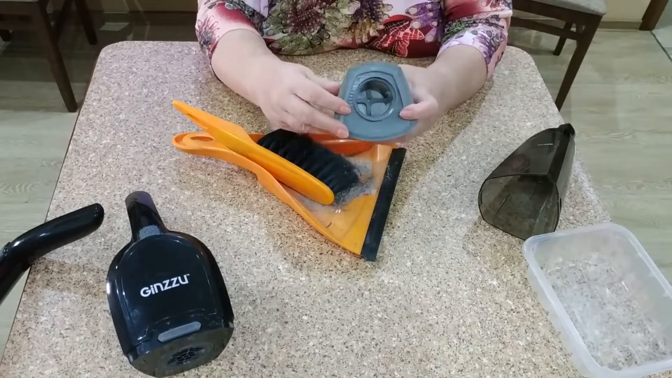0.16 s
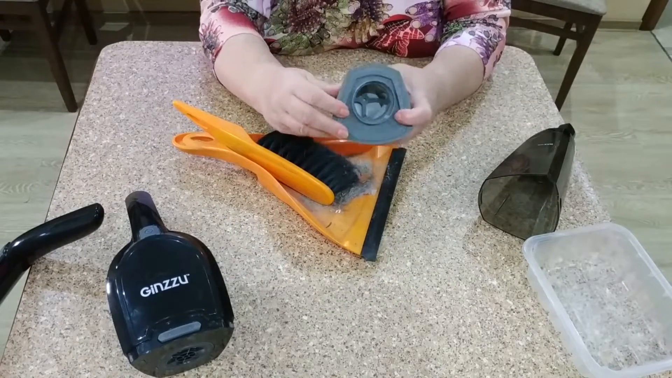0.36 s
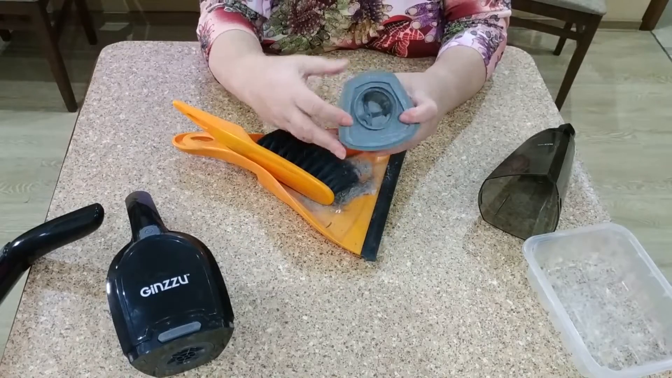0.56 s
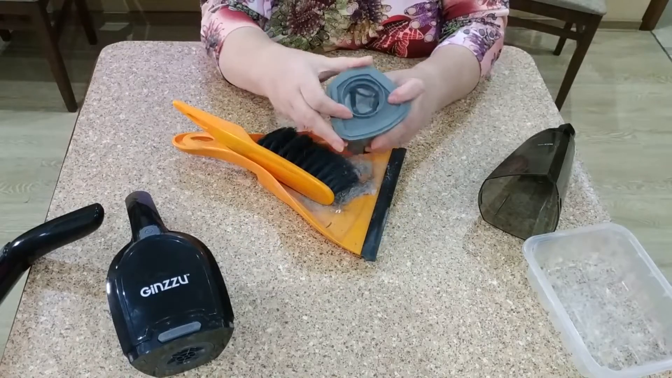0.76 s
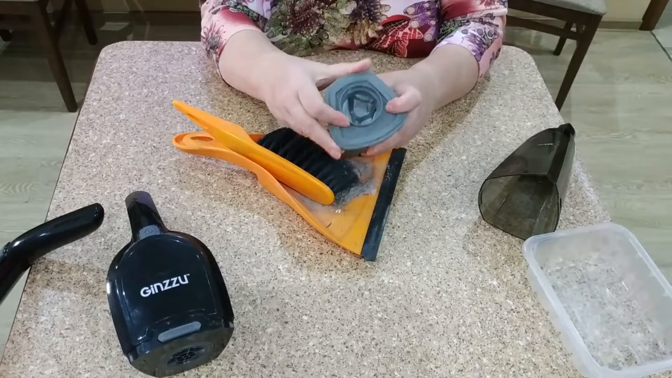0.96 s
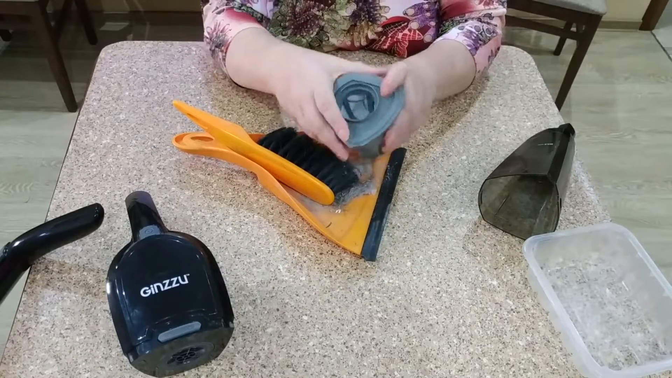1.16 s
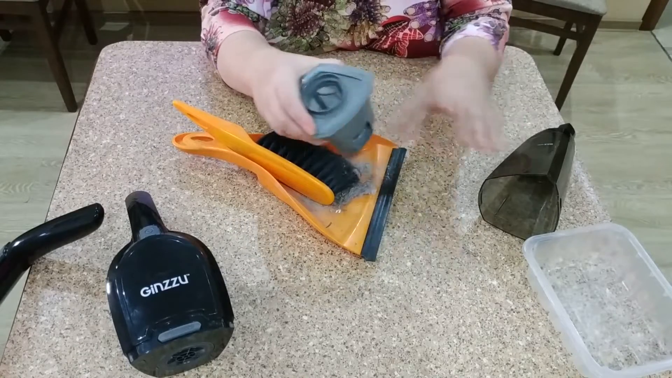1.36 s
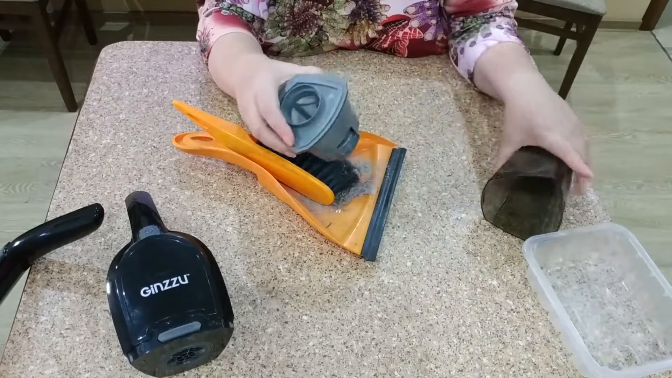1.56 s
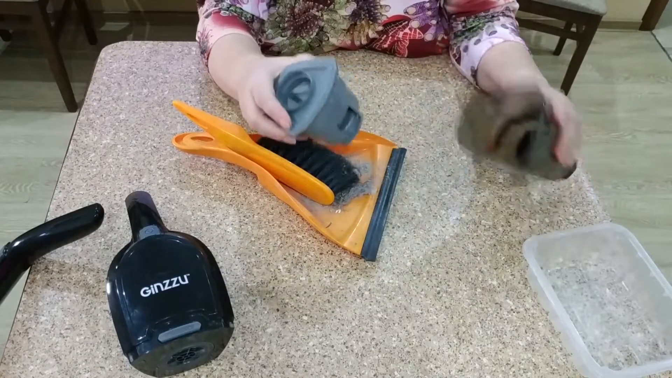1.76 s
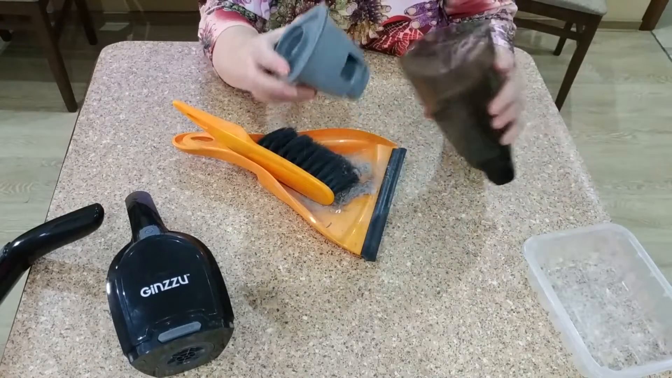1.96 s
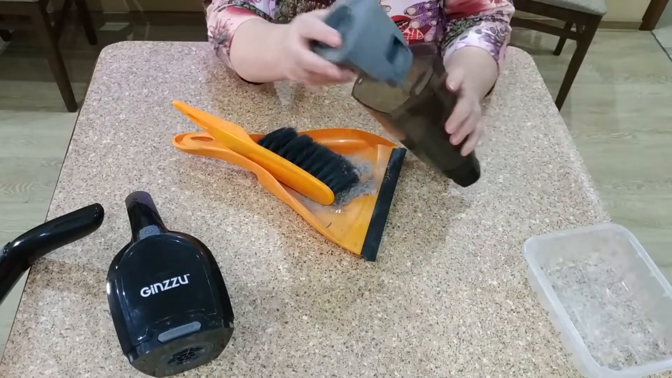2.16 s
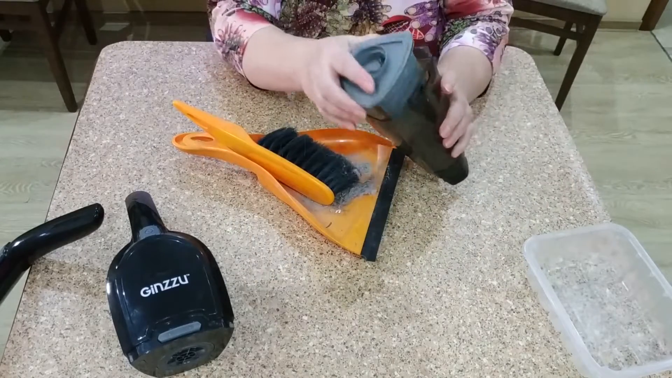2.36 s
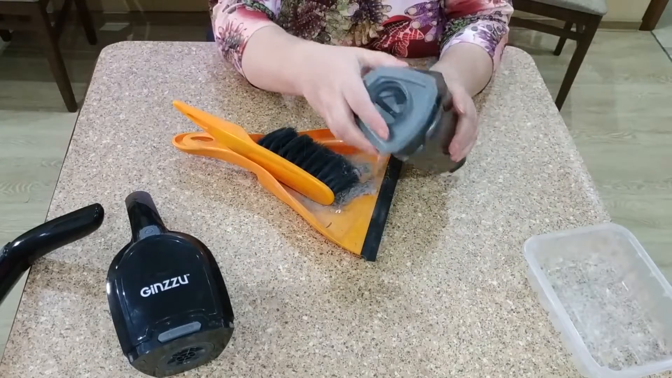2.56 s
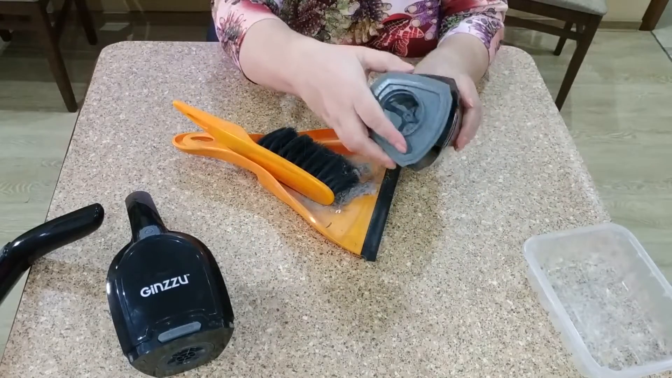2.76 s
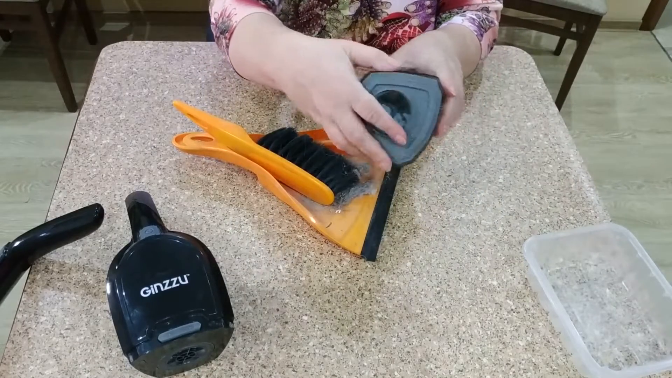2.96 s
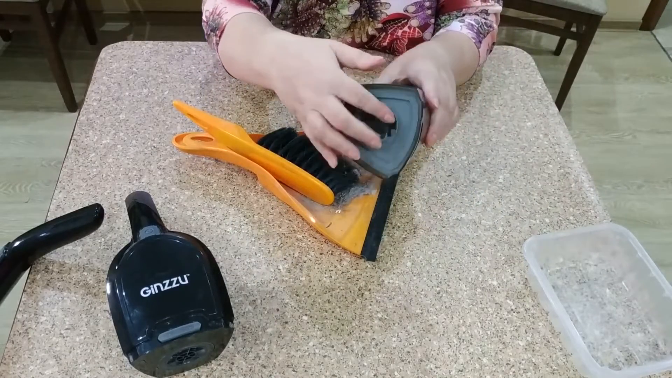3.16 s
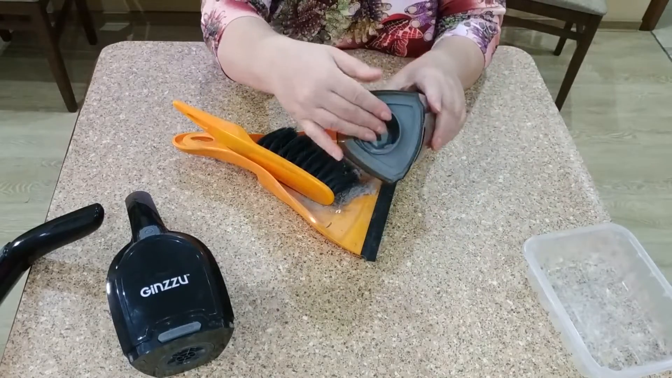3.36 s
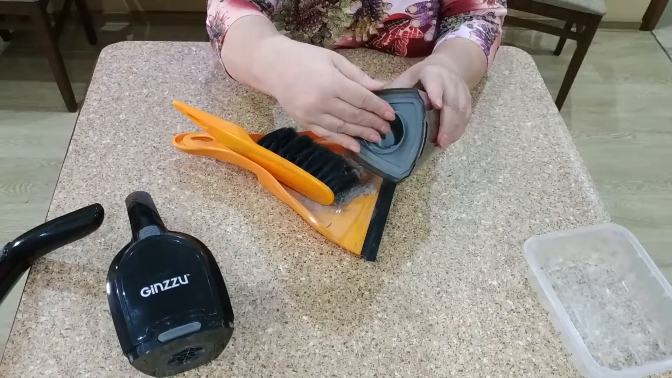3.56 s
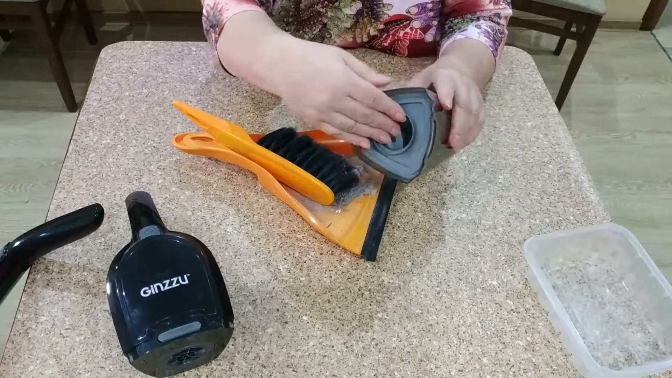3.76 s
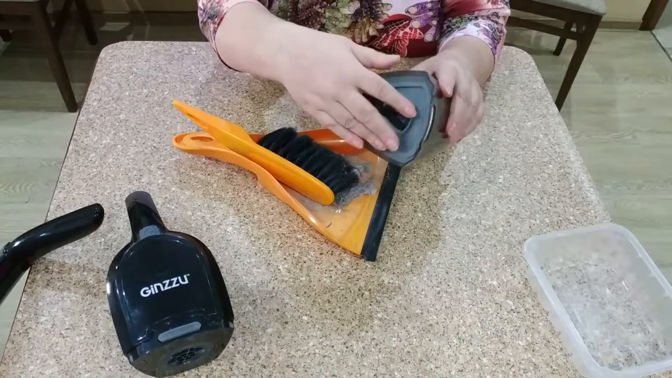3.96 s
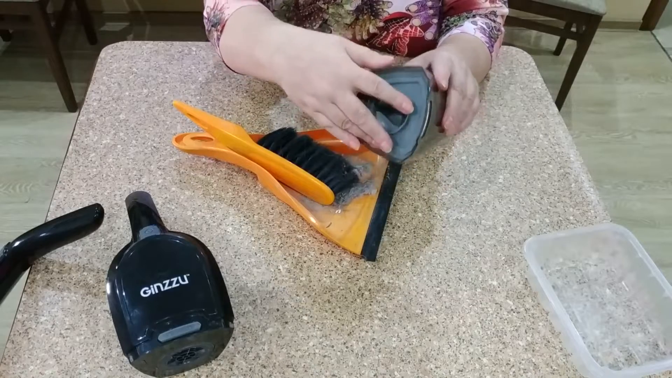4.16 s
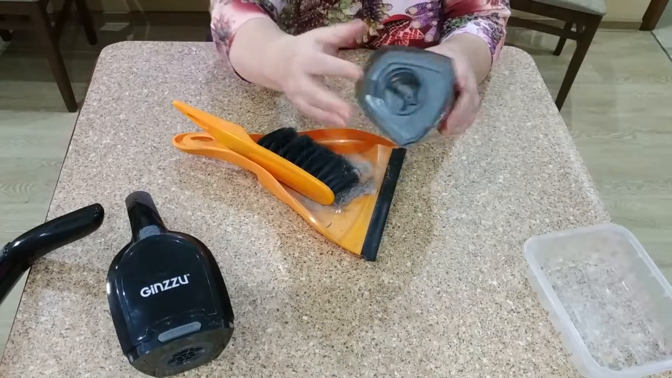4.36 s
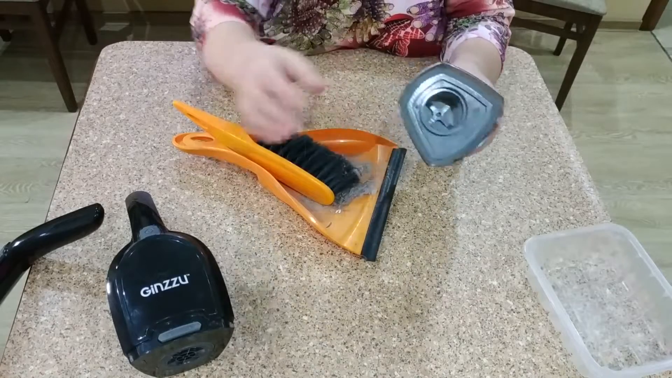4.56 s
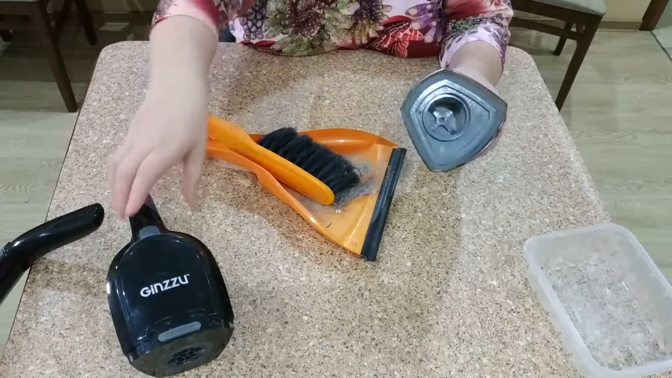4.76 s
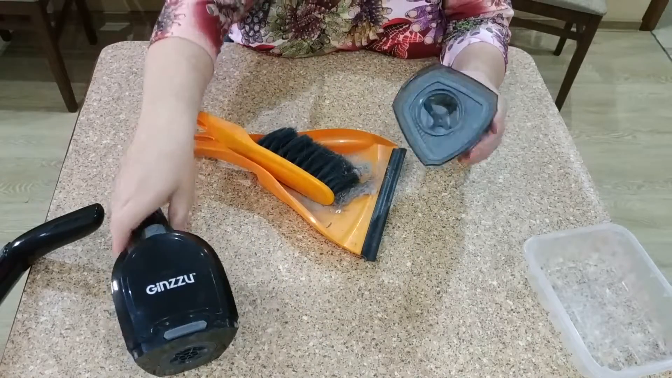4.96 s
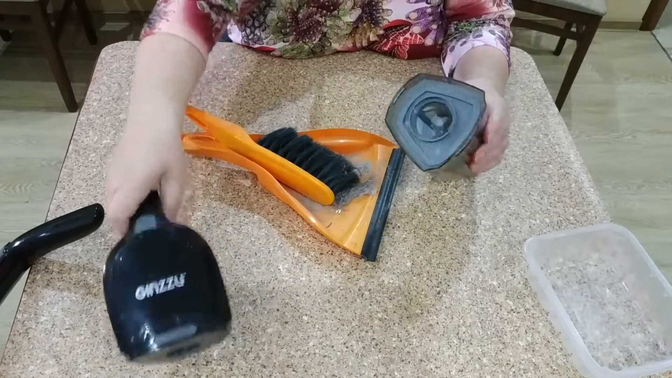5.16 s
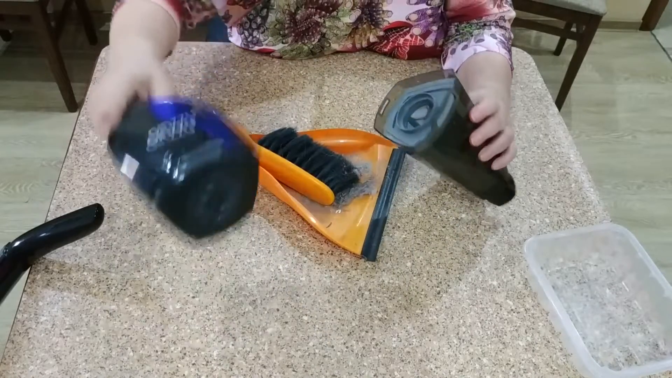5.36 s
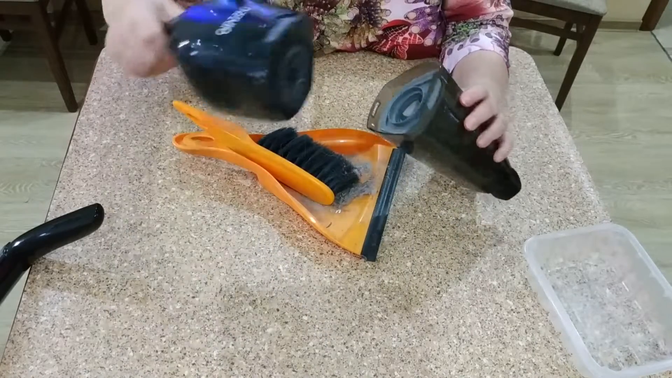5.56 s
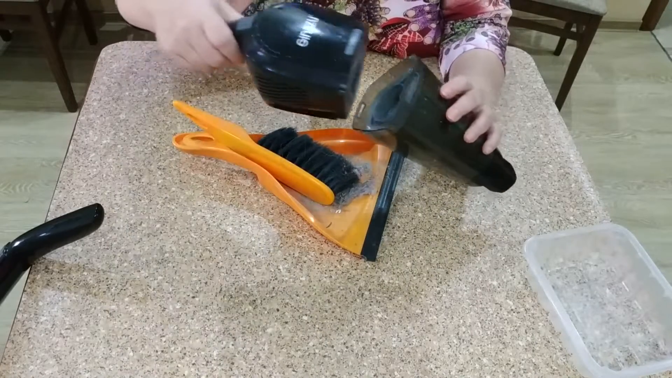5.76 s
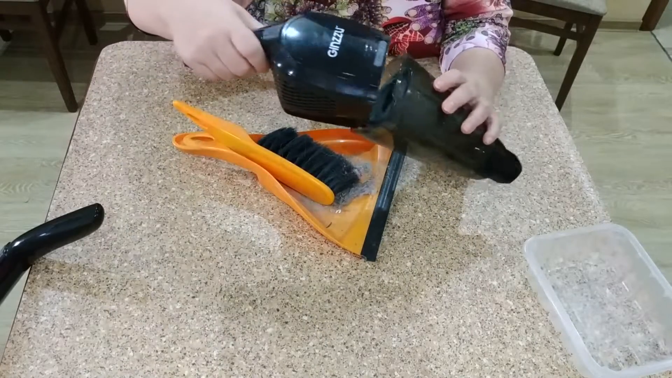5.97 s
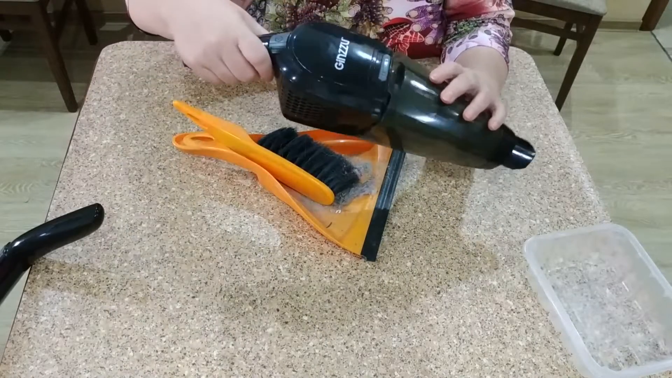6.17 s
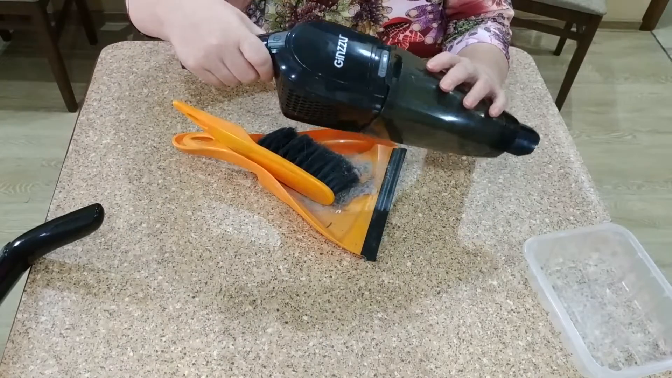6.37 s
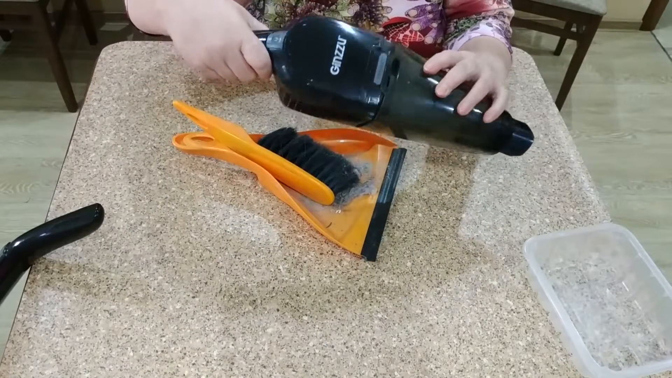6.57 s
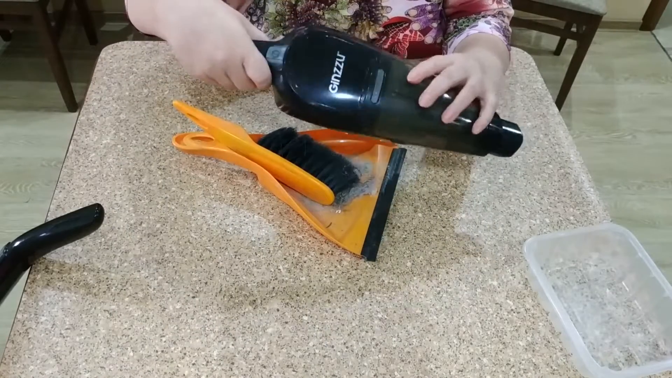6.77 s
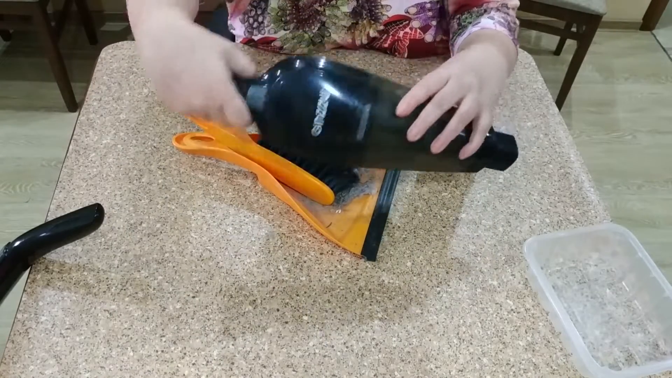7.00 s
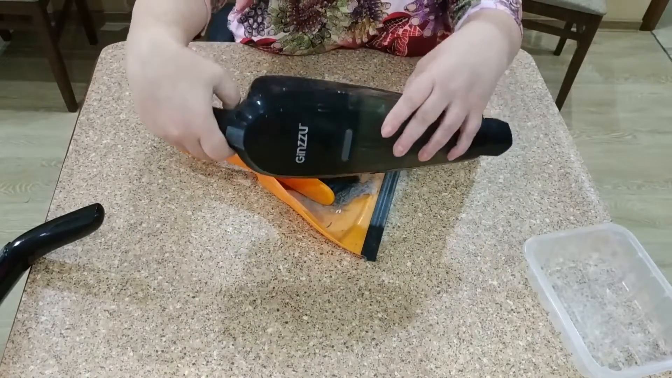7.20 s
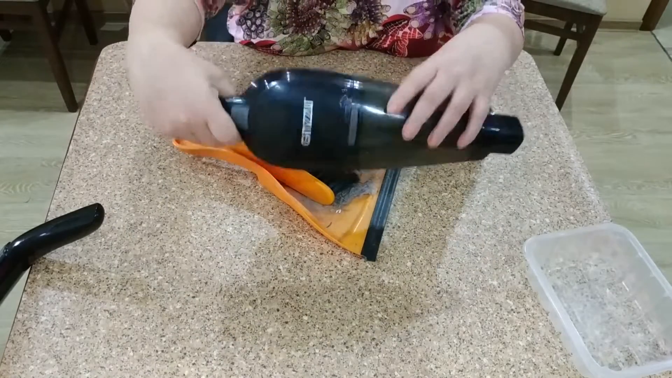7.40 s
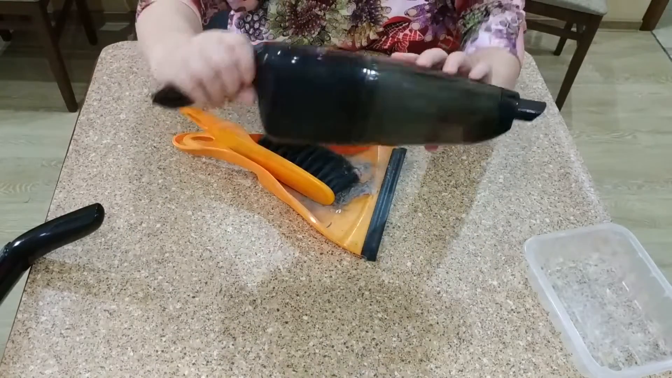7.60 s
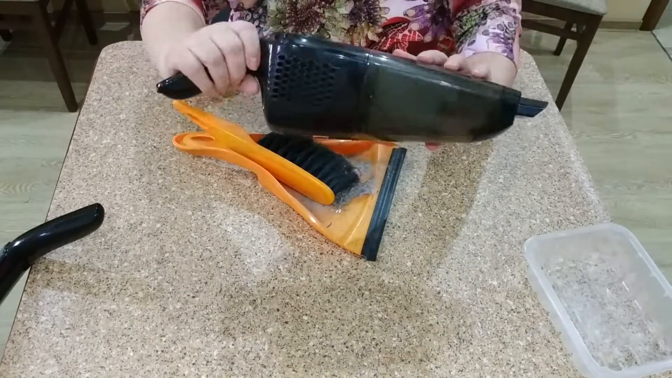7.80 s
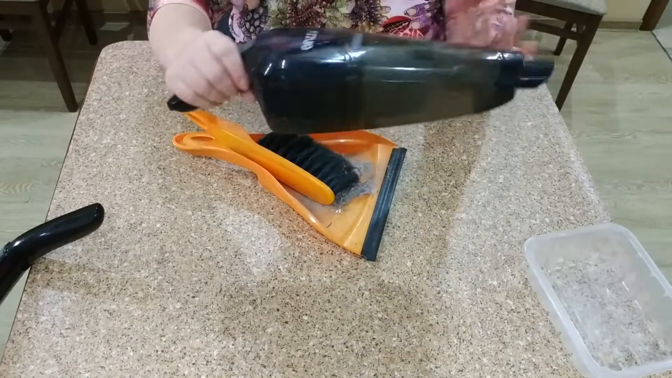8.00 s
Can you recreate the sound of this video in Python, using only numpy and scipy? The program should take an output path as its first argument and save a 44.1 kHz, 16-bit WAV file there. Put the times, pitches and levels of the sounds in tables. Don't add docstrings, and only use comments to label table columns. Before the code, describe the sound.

In a quiet, slightly live room, hands rub and tick against light plastic parts. A soft hollow knock is followed by a loud clack and short grind as a filter is pushed into a cup. After faint handling, the motor body knocks on in a cluster and latches with a very sharp snap. Close stereo microphone above the table.

```python
import sys
import numpy as np
from scipy import signal
from scipy.fft import rfft, irfft
from scipy.io import wavfile
from scipy.ndimage import map_coordinates

SR = 44100
rng = np.random.default_rng(int(sys.argv[2]) if len(sys.argv) > 2 else 0)


def amplitude_ratio(level_db):
    exponent = np.asarray(level_db, float) / 20
    return 10 ** exponent


def wav_record(signal):
    frames = np.transpose(np.atleast_2d(signal))
    bounded = np.clip(frames, -1, 1)
    quanta = np.round(bounded * 32767).astype(np.int16)
    wavfile.write(sys.argv[1], SR, quanta)


N = 354475

EDGE_PAN_DB = 1.8
BRIGHT_SHORTENS_DB = 0.14


def rms_one(x):
    return x / np.sqrt(np.mean(x ** 2) + 1e-20)


def at_hz(points, hz, column=1):
    points = np.array(points)
    return np.interp(np.log(hz), np.log(points[:, 0]), points[:, column])


def band(x, low_hz, high_hz):
    return signal.sosfilt(signal.butter(2, [low_hz, high_hz], "band", fs=SR, output="sos"), x)


def drift(rate_hz):
    knots = rng.standard_normal(4000)
    position = np.arange(N) * rate_hz / SR % 3990
    return map_coordinates(knots, [position], order=1) * 1.22


def ring(force, hz, t60):
    radius = amplitude_ratio(-60 / (max(t60, .002) * SR))
    angle = 2 * np.pi * hz / SR
    return signal.lfilter([0, np.sin(angle)], [1, -2 * radius * np.cos(angle), radius ** 2], force + 1e-18)


def add(track, s, sound):
    i = int(round(s * SR))
    track[..., i:i + sound.shape[-1]] += sound[..., :N - i]


def stereo_bands(size):
    edges_hz = 30 * 2 ** np.arange(0, 9.6, .5)
    white = rng.standard_normal((2, 2, size))
    for k, (low, high) in enumerate(zip(edges_hz, edges_hz[1:])):
        yield np.sqrt(low * high), band(white[k % 2], low, high)


def spread(mid, side, alike):
    alike = np.clip(alike, -1, 1)
    return np.sqrt(1 + alike) * mid + np.sqrt(1 - alike) * side * [[1], [-1]]


def swells(s, db, length):
    swell_db, fade_db = 17.5, 11.5
    t = np.arange(0, N + 64, 64) / SR
    late = (t - np.c_[s]) / np.maximum(np.c_[length], .01)
    drop_db = np.where(late < 0, -swell_db * late, fade_db * late)
    power = amplitude_ratio(2 * (np.c_[db] - drop_db)).sum(0)
    return np.interp(np.arange(N) / SR, t, np.sqrt(power))


def knocks(rows, modes, free_db, tighten, dull_db, rise):
    damping = 7.5
    thuds, drive, far = np.zeros((3, N))
    click = np.eye(1, 8192)[0]
    padded = signal.lfilter([.2], [1, -.8], click)
    t = np.arange(8192) / SR
    for s, db, hz, t60, wet_db in rows:
        press = 1 - np.exp(-t * hz / max(rise, .01))
        thud = ring(padded, hz, t60) * press
        thud = thud * amplitude_ratio(db - 4.0) / np.abs(thud).max()
        add(thuds, s, thud)
        handed_db = free_db - tighten * (db + 29.5) - dull_db * np.log2(hz / 500)
        add(drive, s, thud * amplitude_ratio(handed_db))
        broad = ring(click, hz, min(t60, 19.0 / hz))
        add(far, s, broad * press * amplitude_ratio(db + wet_db))
    first, last = int(min(rows)[0] * SR), int((max(rows)[0] + 1) * SR)
    shell = np.zeros(last - first) if last <= N else np.zeros(N - first)
    for k, (hz, db, t60) in enumerate(modes):
        mode = ring(drive[first:last], hz, min(t60, damping / np.sqrt(hz)))
        shell += amplitude_ratio(db - 47.5) * mode * (-1) ** k
    thuds[first:last] += shell
    return thuds * amplitude_ratio([[-.3], [.3]]), far


def body_blows():
    # (time [s], peak level [dB], pitch [Hz], t60 [s], room share [dB])
    blows = [(5.976, -31, 330, 0.025, -21), (5.9885, -15.5, 394, 0.025, -5),
             (6.107, -18.5, 260, 0.014, 2.5), (6.146, -35, 280, 0.036, 5), (6.246, -7, 332, 0.026, -6),
             (6.2625, -12, 355, .035, -8), (6.2565, -20, 900, .015, -8), (6.263, -20, 900, .02, -8),
             (6.147, -28, 800, .03, -8), (6.007, -27, 380, 0.028, -6), (6.122, -23, 330, .02, -6),
             (6.352, -25.5, 330, 0.029, -6), (6.619, -50, 858, 0.095, 0), (6.749, -18.5, 586, 0.0077, 1),
             (6.768, -38, 920, 0.01, 7), (6.783, -9.5, 257, 0.014, -26), (7.698, -49, 450, 0.021, -9),
             (7.7, -50, 240, 0.028, -9), (7.917, -29.5, 2070, 0.0053, -8), (7.98, -42.5, 765, 0.03, -9)]
    # (time [s], peak level [dB], pitch [Hz], t60 [s], room share [dB])
    more_blows = [(5.991, -35, 1120, 0.0086, 3), (6.113, -22, 927, 0.033, -3.5),
                  (6.12, -25.5, 680, 0.067, 1), (6.2465, -7, 880, 0.012, -11),
                  (6.248, -20, 1850, 0.036, -21), (6.247, -21.5, 2940, .008, -5), (5.99, -36, 2400, .012, 0),
                  (6.77, -23, 3400, .012, 2), (6.782, -16, 5760, .012, -3), (7.919, -42.5, 800, .02, -7),
                  (7.725, -44, 2250, 0.022, -9), (6.343, -24.5, 990, 0.028, -8),
                  (6.3434, -18, 1900, 0.012, -19), (6.35, -36, 373, 0.024, -5),
                  (6.7828, -3.5, 880, .013, -2), (6.784, -11, 1950, .01, 7), (6.783, -16, 250, .02, -12),
                  (6.791, -14, 800, .02, -9), (6.803, -16, 750, .01, -9), (7.556, -35, 1710, 0.0079, -13)]
    # (frequency [Hz], level [dB], t60 [s])
    modes = [(274, -7, 0.092), (304.2, 3.5, 0.31), (362.5, 7.5, 0.43), (390, -6, 0.25), (553, -20, 0.19),
             (670, 2, 0.4), (730, -58, 0.22), (858, 3, 0.37), (932, -1, .3), (1170, -9, 0.1),
             (1840, -8, .15), (2270, -13, 0.22), (2790, -12, .15)]
    return knocks(blows + more_blows, modes, free_db=-6, tighten=0.19, dull_db=6, rise=0.12)


def cup_blows():
    # (time [s], peak level [dB], pitch [Hz], t60 [s], room share [dB])
    blows = [
        (3.007, -3, 785, 0.018, -7),
        (3.0075, -11, 431, 0.045, 0),
        (3.0235, -8, 776, 0.04, -11),
        (3.025, -11, 423, 0.05, -2),
        (3.008, -20, 200, .05, -5),
    ]
    # (time [s], peak level [dB], pitch [Hz], t60 [s], room share [dB])
    more_blows = [
        (3.008, -17, 1927, 0.042, -24),
        (3.0082, -14, 3260, 0.0036, 3.5),
        (3.01, -22, 4800, 0.012, -3),
        (3.023, -27.5, 1470, 0.033, 11.5),
        (3.067, -25, 3150, 0.05, -3.5),
        (3.071, -19.5, 3100, .05, -3),
        (3.081, -22.5, 5900, .012, 1),
        (3.036, -14.5, 900, .015, -8.5),
        (3.082, -19, 2790, 0.026, -8),
    ]
    # (frequency [Hz], level [dB], t60 [s])
    modes = [(291.4, -1.5, 0.38), (350, -7.5, 0.54), (418, 2, 0.32), (455, -4, 0.15), (551, -3.5, 0.54),
             (623, -2.5, 0.34), (717, -1.5, 0.37), (785, 5.5, 0.086), (870.4, 0.5, 0.37), (1065, -7, .25),
             (1244, -21, 0.23), (1470, 2.5, 0.085), (1927, -29, 0.11)]
    return knocks(blows + more_blows, modes, free_db=-1, tighten=0.075, dull_db=.1, rise=.15)


def loose_blows():
    # (time [s], peak level [dB], pitch [Hz], t60 [s], room share [dB])
    blows = [(2.379, -27, 560, 0.03, 1), (2.383, -32, 863, 0.09, -2), (2.382, -29, 1470, 0.035, -12),
             (2.381, -32, 1200, 0.025, -5), (2.415, -34, 540, .04, -10), (2.597, -20, 451, 0.03, -10),
             (2.5992, -15.5, 445, .08, -6), (2.603, -25, 274, 0.06, -4), (2.381, -32, 330, .03, 0),
             (2.395, -31, 520, .03, -4), (2.636, -23, 500, .03, -10), (2.647, -24, 420, .05, -10),
             (2.6, -32, 1000, .02, -3), (2.668, -38, 830, .04, -8), (2.599, -31, 1550, 0.06, -12),
             (2.6, -38, 1965, .04, -10)]
    # (frequency [Hz], level [dB], t60 [s])
    modes = [(215, -8, .25), (275, 0, .3), (339, 0, .4), (431, 0, .3), (468, -4, .3), (540, -2, .34),
             (625, -4, .3), (727, -4, .35), (865, 1, .37), (1136, -7, .3), (1244, -10, .23), (1475, -3, .2),
             (1561, -6, .25)]
    return knocks(blows, modes, free_db=-8, tighten=.1, dull_db=.1, rise=.5)


def fingertip_blows():
    # (time [s], peak level [dB], pitch [Hz], t60 [s], room share [dB])
    blows = [(0.351, -38.5, 272, 0.01, 6), (0.379, -31, 810, 0.011, -13), (0.3515, -31, 830, 0.015, 1),
             (0.638, -52, 842, 0.045, -17), (1.294, -43, 1086, 0.076, -6),
             (1.525, -42.5, 1020, 0.065, -2.5), (1.609, -55, 260, 0.028, -10), (1.679, -37, 250, 0.018, -5),
             (1.7685, -11.5, 247, 0.015, -3.5), (3.512, -52, 740, 0.063, 1),
             (3.553, -39.5, 1050, 0.012, -2.5), (4.341, -49.5, 310, 0.054, 1), (4.629, -47, 820, 0.024, -8),
             (4.637, -46.5, 1120, 0.013, 0), (4.897, -32, 714, 0.029, -12), (4.9, -30.5, 844, 0.024, -8),
             (4.934, -38, 950, .04, -9), (5.196, -57, 187, 0.064, -2), (5.442, -42, 600, 0.01, -4),
             (5.452, -53, 257, 0.027, -3), (5.619, -58.5, 835, 0.087, -14)]
    # (time [s], peak level [dB], pitch [Hz], t60 [s], room share [dB])
    more_blows = [(.352, -28, 1110, 0.024, -9), (.351, -38, 5100, .015, -6), (5.1955, -42, 800, .015, -3),
                  (1.77, -24, 130, .06, -6), (1.758, -26, 300, 0.02, -6), (1.763, -20.5, 170, 0.033, 1.5),
                  (1.766, -28.5, 1900, 0.023, -4.5), (1.757, -35, 2080, 0.033, -6),
                  (1.792, -26, 268, .025, -8), (1.802, -24, 285, 0.026, -9), (1.769, -32, 1080, 0.052, -23),
                  (1.772, -29, 517, 0.018, -0.5), (1.768, -24.5, 690, 0.01, -6.5),
                  (1.84, -45, 2040, 0.095, -11), (4.897, -31, 1460, 0.0085, -2),
                  (4.903, -33, 251, 0.025, 2.5), (5.195, -39.5, 1000, 0.0072, 0)]
    # (frequency [Hz], level [dB], t60 [s])
    modes = [(192.3, 0.5, 0.2), (229.6, -0.5, 0.31), (300, 7, 0.075), (330, -4, 0.29), (744, 1.5, 0.087),
             (810, 2.5, 0.25), (920, -9, 0.37), (1240, -1, .2), (2062, -9, .15), (2751, -12, .2)]
    return knocks(blows + more_blows, modes, free_db=-2.5, tighten=0.3944, dull_db=0.2, rise=0.1)


def cracks(rows):
    bite_s = 0.001
    near, far = np.zeros((2, N)), np.zeros(N)
    t, hz = np.arange(2048) / SR, np.fft.rfftfreq(4096, 1 / SR)
    octaves = np.log2(np.clip(hz, 1300., 10500.) / 5000)
    thin = hz ** 2 / (hz ** 2 + 620.0 ** 2)
    grits = rng.standard_normal((len(rows), 2, 2048))
    for (s, db, tilt, t60, pan_db, wet_db), grit in zip(rows, grits):
        colour = thin * amplitude_ratio(tilt * octaves)
        decay = amplitude_ratio(-60 * t / max(t60, .001))
        burst = spread(*grit, 0.76) * decay * np.minimum(t / bite_s, 1) ** 2
        whole = rfft(burst, 4096)
        burst = irfft(whole * colour)[:, :2048]
        size = amplitude_ratio(db) / np.abs(burst.mean(0)).max()
        add(near, s, size * burst * amplitude_ratio([[pan_db / 2], [-pan_db / 2]]))
        strength = np.abs(whole[0])
        even = whole[0] / strength ** 1.103 * np.sqrt(np.mean(strength ** 2)) ** 0.7
        add(far, s, size * irfft(even * colour)[:1024] * amplitude_ratio(wet_db))
    return near, far


def latches():
    # (time [s], peak level [dB], tilt [dB per octave], room share [dB], left over right [dB])
    snaps = [(0.38, -20, 7, 0, 2), (1.611, -27, 12.5, -0.5, 6), (1.7645, -22.5, -1, 4.5, 6),
             (3.0068, -20, -8, 9, 8), (3.8683, -42, 9, 2, 14), (4.8632, -39.5, 8, -1, 12),
             (4.8949, -23, 1.5, 9.5, -4), (4.9, -33, 2.5, 9, 5), (6.7695, -25.5, -1, 14, -1),
             (6.342, -15, -3, 3, 1), (6.781, -4.5, 8, 16, 12), (6.784, 1, -2, 9.5, -8)]
    t60_s = 0.0086
    return cracks([(s, db, tilt, t60_s * amplitude_ratio(-BRIGHT_SHORTENS_DB * tilt), pan, wet)
                   for s, db, tilt, wet, pan in snaps])


def edge_contacts():
    # (time [s], peak level [dB], tilt [dB per octave], room share [dB])
    meetings = [(0.3496, -31, -8, -2), (0.3512, -27.5, 0.5, -1), (0.539, -42, -3, -5), (1.2947, -39, 8, 8),
                (1.671, -45, -15, -2), (1.7563, -31.5, -4.5, -3), (2.3796, -34, -5, 3.5),
                (2.6002, -25.5, -12.5, 5), (2.6098, -36, 0.5, 13), (3.553, -42, 5, 4), (4.341, -41, 2, 13),
                (5.194, -38, -1.5, 10), (5.217, -35.5, -2.5, 2), (5.352, -42, -4, 6.5),
                (5.513, -46, -8, -9), (5.9765, -19.5, -3, 6.5), (5.989, -28.5, -7, 1),
                (6.1068, -17, -4.5, 1), (6.118, -10, -3, 1), (6.2449, -15, -6.5, 3),
                (6.273, -30.5, -2.0, 13), (6.7477, -24, -2.5, 12), (6.769, -16, -1, 7),
                (7.4601, -37, 1.5, 3), (7.723, -42, -2, 6), (7.918, -30.5, -5.5, -2),
                (7.9799, -33.5, -1.5, 4.5)]
    t60_s = .011
    return cracks([(s, db, tilt, t60_s * amplitude_ratio(-BRIGHT_SHORTENS_DB * tilt), EDGE_PAN_DB, wet)
                   for s, db, tilt, wet in meetings])


def catch_slides():
    # (time [s], peak level [dB], tilt [dB per octave], room share [dB], t60 [s])
    grinds = [
        (3.063, -24, -7, 3, 0.049),
        (3.0799, -15.5, -2, 2, 0.02),
        (6.3385, -21, -4.5, -12, 0.038),
    ]
    return cracks([(s, db, tilt, t60, EDGE_PAN_DB, wet) for s, db, tilt, wet, t60 in grinds])


def stray_ticks():
    # (time [s], peak level [dB], tilt [dB per octave], room share [dB], t60 [s])
    loose_ticks = [(1.759, -42, -1, 0, .012), (3.0804, -18.5, 3.5, 7.5, 0.0061),
                   (3.0845, -21, -2, 3, 0.0048), (3.072, -25, -6.5, 0, 0.0096), (4.068, -45.5, 4, 4, .02),
                   (4.886, -48, 3, 0, .01), (4.8993, -27, 3, 2, .003), (5.1945, -36, -5, -3, .005),
                   (6.131, -30, -4, -0.5, .008), (6.2565, -32, -6, 0, .006), (6.349, -28, 0, 0, .006),
                   (6.7832, -2, 0, -5, 0.0018), (6.803, -22, -4, 0, .006), (6.821, -24, -2, 0, .006)]
    return cracks([(s, db, tilt, t60, EDGE_PAN_DB, wet) for s, db, tilt, wet, t60 in loose_ticks])


def rubbing():
    # (time [s], rustle level [dB], hiss over rustle [dB], length [s])
    strokes = [(0.0, -52, -7, 0.061), (0.13, -61, 7.5, 0.075), (0.328, -59.5, 0, 0.075),
               (.55, -66.5, 4.5, 0.77), (0.804, -60.5, 4.5, 0.18), (1.09, -54.5, 9.5, 0.055),
               (1.283, -59, 5, 0.18), (1.522, -56, 6, 0.058), (1.633, -53, -1.5, 0.098),
               (2.174, -67, 8, 0.24), (2.569, -54.5, 2, 0.19), (2.835, -56.5, -1, 0.1),
               (2.996, -51, 2.5, 0.15), (3.326, -67, 10.5, 0.15), (3.625, -61.5, -1.5, 0.35),
               (3.828, -62.5, 1, 0.14), (4.076, -57.5, 2, 0.086), (4.366, -51, 2.5, 0.072),
               (4.632, -62, -20.5, 0.091), (5.05, -62, 9.5, 0.25), (5.202, -55, 3.5, 0.071),
               (5.443, -63, 4.5, 0.25), (5.635, -62, 1, 0.1), (5.9, -64, -9, .25), (6.654, -64, -11, 0.22),
               (7.15, -58, 4, 0.21), (7.618, -61, 5.5, 0.22), (7.697, -63.5, 4, 0.1),
               (7.948, -61, 4, 0.075), (8.03, -54, -5, 0.11)]
    # (time [s], level [dB], length [s])
    drags = [(0.047, -55.5, 0.036), (.33, -60, 0.12), (0.496, -62, 0.59), (1.17, -69, .3),
             (1.505, -58.5, 0.1), (1.63, -53.5, .08), (2.57, -52, 0.042), (2.85, -63.5, 0.34),
             (3.58, -61, 0.14), (3.847, -60.5, 0.16), (4.077, -62, 0.2), (4.362, -58, 0.12),
             (4.624, -61, .15), (5.2, -56.5, 0.062), (5.46, -59.5, 0.14), (5.62, -68, 0.27),
             (5.952, -61, 0.36), (6.497, -58.5, .1), (6.671, -62, 0.17), (7.217, -59, 0.099),
             (7.585, -63, 0.14), (7.703, -52, 0.028), (7.963, -62.5, 0.19)]
    s, db, bright_db, length = np.transpose(strokes)
    grain = amplitude_ratio(2.0 * rng.exponential(1, (3, 1, N)))
    slips = rng.standard_normal((3, 2, N)) * grain
    hiss = rms_one(band(spread(*slips[0], 0.059), 6800, 18600))
    hiss = hiss * swells(s, db + bright_db, length) * amplitude_ratio(1.14 * drift(65))
    rustle = rms_one(band(spread(*slips[1], 0.13), 570, 4200))
    rustle = rustle * swells(s, db, length) * amplitude_ratio(2.67 * drift(45))
    rumble = rms_one(band(spread(*slips[2], .9), 155.0, 370)) * swells(*np.transpose(drags))
    return hiss + rustle + rumble


def hums():
    # (time [s], level [dB], pitch [Hz], length [s])
    cavity_notes = [(.45, -69, 330, .15), (1.45, -67, 333, .2), (7.1, -63, 859, .1), (7.21, -59, 332, .07),
                    (7.3, -65.5, 318, .06), (7.27, -70, 865, .1), (7.57, -62, 339, .1),
                    (7.63, -62, 856, .04), (7.62, -66, 1120, .04), (7.77, -65, 330, .06),
                    (7.92, -64, 394, .12), (7.98, -66, 330, .08)]
    t60_s = 0.14
    grit = rng.standard_normal(N)
    return sum(rms_one(ring(grit, hz, t60_s)) * swells([s], [db], [length])
               for s, db, hz, length in cavity_notes)


def room_response():
    # (frequency [Hz], t60 [s], level [dB], left-right likeness [-1..1])
    tail_bands = [(146.3, 0.52, -13, 0.95), (370, 0.35, -4, 0.78), (1000, 0.44, -3.5, 0.1),
                  (2300, 0.45, -1, 0.091), (5740, .4, -3.5, 0.037), (14220, 0.23, -3, 0.061)]
    # (time [s], left level [dB], right level [dB])
    reflections = [
        (.0031, -6, -5),
        (0.0182, -7.5, -10),
        (0.037, -27, -19.5),
    ]
    level_db, build_s, echo_hz = -26.5, 0.00067, 2500
    t = np.arange(SR) / SR
    tail = np.zeros((2, SR))
    for hz, (mid, side) in stereo_bands(SR):
        decay_db = at_hz(tail_bands, hz, 2) - 60 * t / at_hz(tail_bands, hz)
        tail += amplitude_ratio(decay_db) * spread(mid, side, at_hz(tail_bands, hz, 3))
    tail = tail * amplitude_ratio(level_db) * (1 - np.exp(-(t / build_s) ** 2))
    for s, left_db, right_db in reflections:
        add(tail, s, amplitude_ratio([[left_db], [right_db]]) * signal.firwin(31, echo_hz, fs=SR))
    return tail


def hush():
    # (frequency [Hz], density [dB per Hz])
    density = [(25, -48), (95, -12), (200, -0.5), (1010, -6), (2400, -14), (5170, -15.5), (14000, -14.5),
               (16000, -19)]
    # (frequency [Hz], left-right likeness [-1..1])
    likeness = [(60, 0.35), (180, 0.76), (550, 0.046), (1650, 0.064), (4970, 0.018), (15000, 0.031)]
    together = drift(2.9)
    tone = np.zeros((2, N))
    for hz, (mid, side) in stereo_bands(N):
        level_db = at_hz(density, hz) + 0.11 * together + 2.8 * drift(23)
        tone += amplitude_ratio(level_db) * spread(mid, side, at_hz(likeness, hz))
    return amplitude_ratio(-58) * rms_one(tone)


def scene():
    near, far = np.zeros((2, N)), np.zeros(N)
    for source in (body_blows, cup_blows, loose_blows, fingertip_blows,
                   latches, edge_contacts, catch_slides, stray_ticks):
        direct, sent = source()
        near, far = near + direct, far + sent
    reverberant = signal.oaconvolve(far[None], room_response(), axes=1)[:, :N]
    return near + reverberant + rubbing() + hums() + hush()


def low_pass(x):
    return signal.sosfilt(signal.butter(12, 16970, fs=SR, output="sos"), x)


def record(dry):
    bass_cut_hz, leak_db, treble_cut_hz = 163, -22.5, 15720
    ceiling_db, release_db_s, attack_s = -6.5, 136, 0.0022
    x = signal.sosfilt(signal.butter(6, bass_cut_hz, "high", fs=SR, output="sos"), dry)
    x = x + amplitude_ratio(leak_db) * dry
    over_db = np.maximum(20 * np.log10(np.abs(x).max(0) + 1e-9) - ceiling_db, 0)
    ramp = release_db_s * np.arange(N) / SR
    held_db = np.maximum.accumulate(over_db + ramp) - ramp
    grip = np.exp(-1 / (attack_s * SR))
    x = x * amplitude_ratio(-signal.lfilter([1 - grip], [1, -grip], held_db))
    x = .95 * np.tanh(x / .95)
    x = signal.sosfilt(signal.ellip(12, .5, 60, treble_cut_hz, fs=SR, output="sos"), x)
    return low_pass(x)


dry = scene()
out = record(dry)
wav_record(out)
```